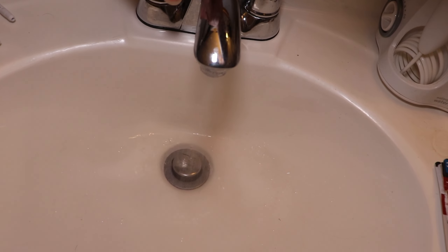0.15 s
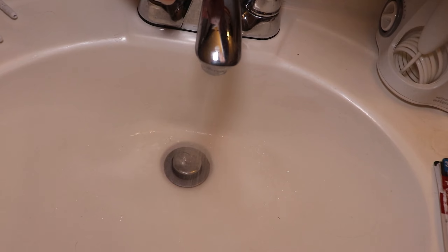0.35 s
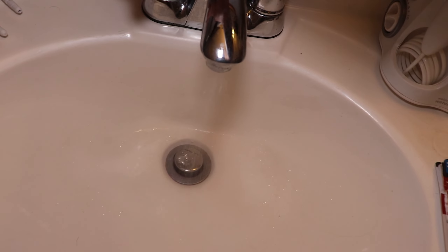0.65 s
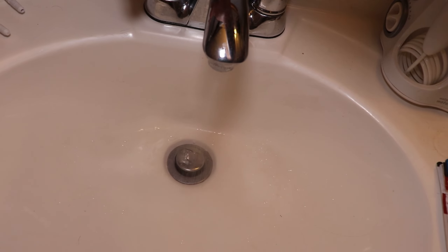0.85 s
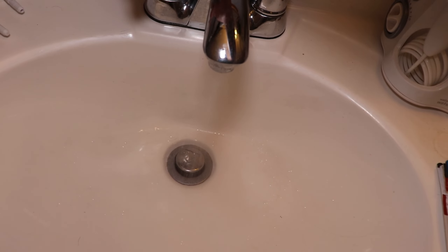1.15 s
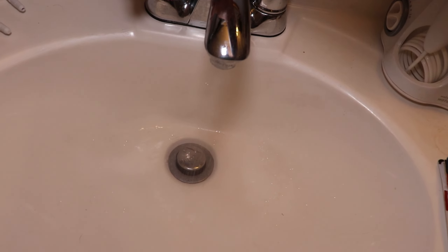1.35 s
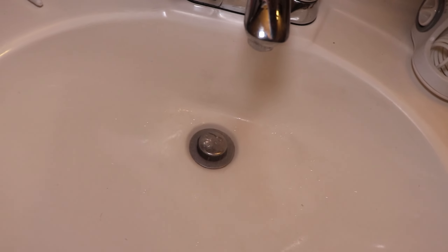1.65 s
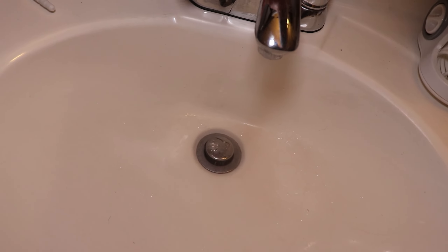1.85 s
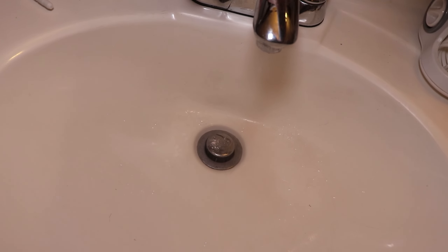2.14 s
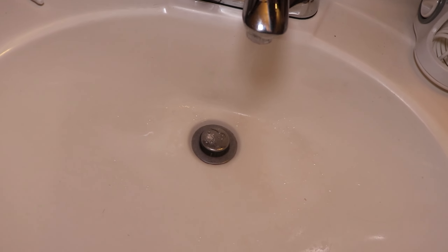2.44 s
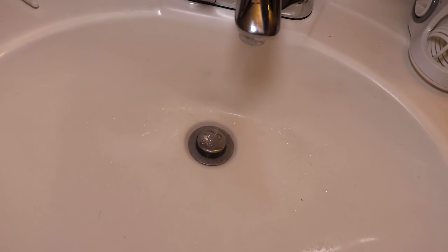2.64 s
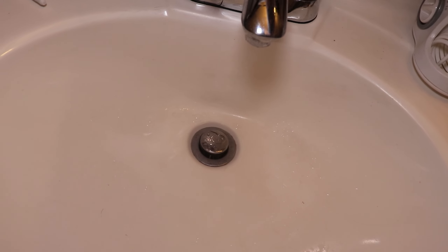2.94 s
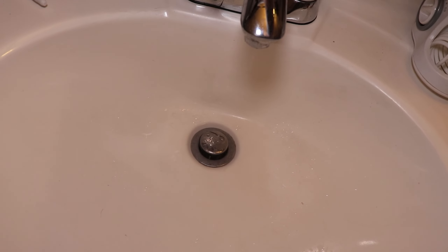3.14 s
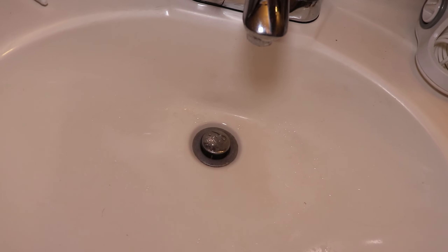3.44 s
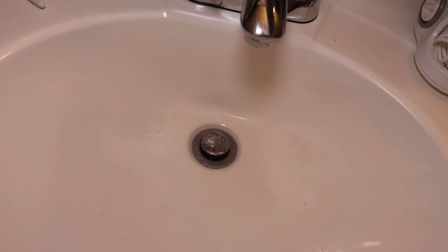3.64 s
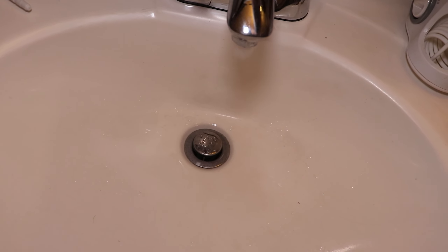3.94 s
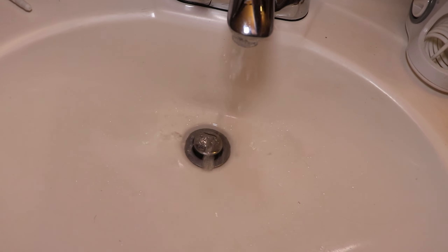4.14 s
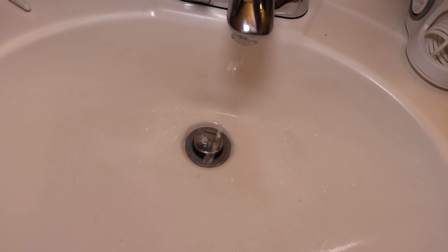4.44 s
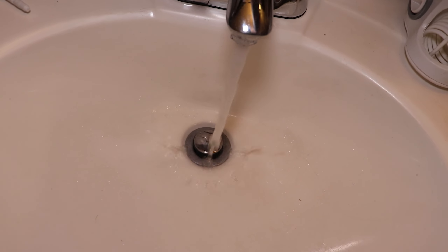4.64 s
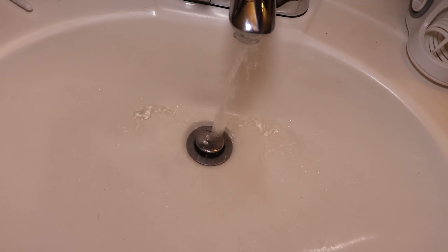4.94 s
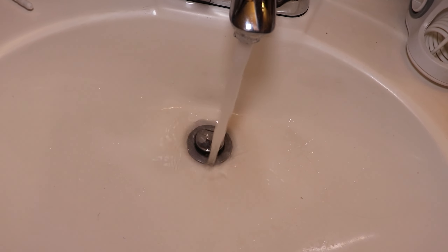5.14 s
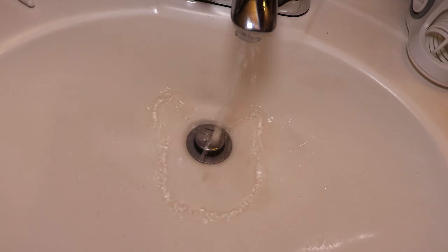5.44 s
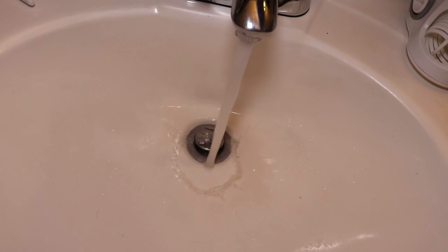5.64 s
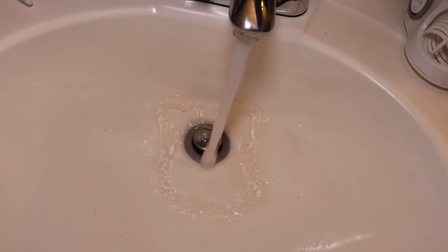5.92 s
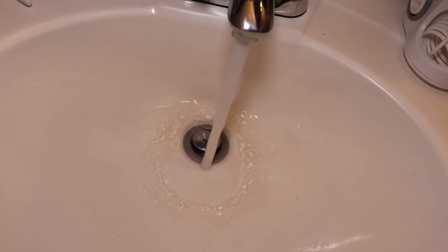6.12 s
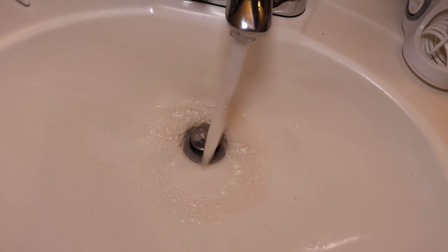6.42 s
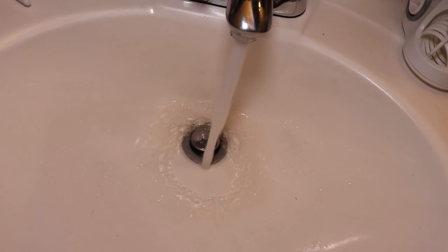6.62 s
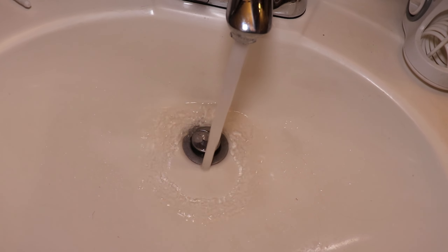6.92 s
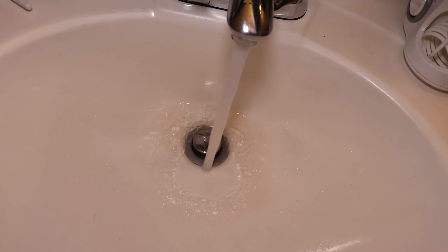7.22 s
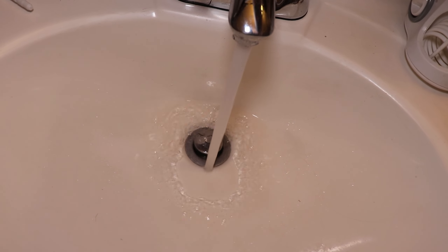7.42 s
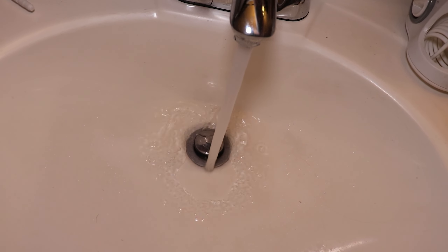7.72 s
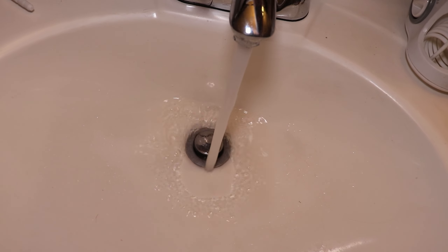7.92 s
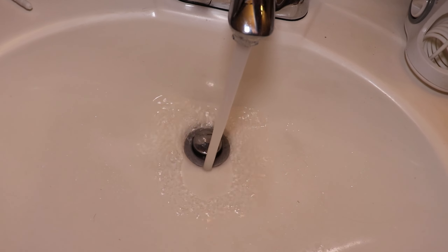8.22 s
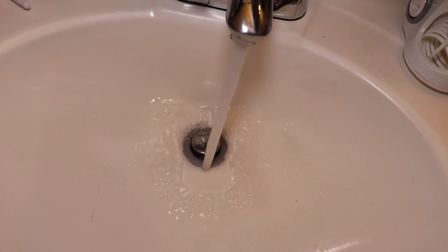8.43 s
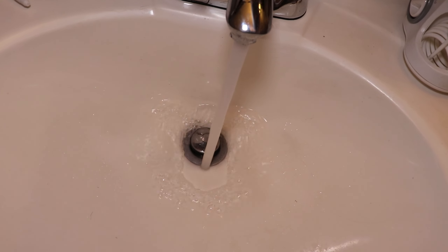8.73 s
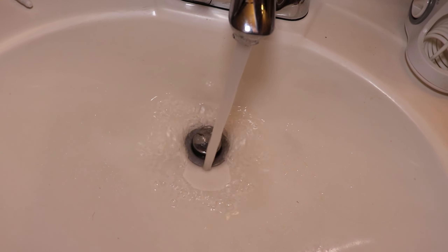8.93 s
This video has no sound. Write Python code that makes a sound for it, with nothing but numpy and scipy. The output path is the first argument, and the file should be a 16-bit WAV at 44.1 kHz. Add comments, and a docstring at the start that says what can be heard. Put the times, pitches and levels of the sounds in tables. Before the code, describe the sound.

Close up in a small hard-walled bathroom, a tap hisses loudly with escaping air while fine mist drums on the basin. The hiss slowly weakens, then chokes as water arrives in violent spits, hissing blasts and hollow slaps, with low gurgles underneath. The spitting thins out and a soft, fizzy aerated stream runs steadily into the drain.

```python
"""In a bathroom, a tap blows out trapped air: a long loud hiss with a mist of water that drums on the basin.
Slugs of water then cut the hiss into blasts and many spits, low gurgles and rumbles sound,
and the flow settles into a soft aerated stream that runs into the drain.
Air and water are showers of random impacts, filtered by the spout, basin, drain and pipe they excite;
large bubbles are decaying sines, and an echo tail stands for the hard walls."""
import sys
import numpy as np
from scipy import signal
from scipy.fft import rfft, next_fast_len
from scipy.io import wavfile
from scipy.ndimage import uniform_filter1d

SR = 44100
rng = np.random.default_rng(int(sys.argv[2]) if len(sys.argv) > 2 else 0)


def transcribe(u):
    """Save the signal u as a 16-bit wav file named by the first command-line argument.

    u: samples, shape (n,) or (channels, n), limited to [-1, 1]; the rate is SR.
    q: integer samples, one column per channel.
    """
    v = np.clip(np.atleast_2d(u).T, -1, 1)
    q = np.round(v * 32767).astype(np.int16)
    wavfile.write(sys.argv[1], SR, q)


N = 399987
TIME = np.arange(N) / SR
TAPS = 8192  # length of the filter design grid
HZ = np.fft.rfftfreq(TAPS, 1 / SR)

# All table levels in dB are relative: gains inside the functions trim them.
# Running stream. Each row: time in seconds, fizz in dB, splashing in dB,
# churn of its remaining air on the basin in dB.
STREAM_LEVELS = [(4.7, -44, -43, -43), (4.8, -44, -43, -44.5), (4.87, -39, -46, -45.5),
                 (5.2, -44, -48, -46.5), (5.28, -38, -38.5, -45), (5.42, -41, -44.5, -44),
                 (5.8, -39, -45, -47), (6.2, -38.5, -46, -39), (6.6, -37.5, -47, -40.5),
                 (6.95, -37.5, -46.5, -40.5), (7.4, -38.5, -45, -44.5), (7.8, -39.5, -49, -48),
                 (8.1, -39.5, -46.5, -48), (8.38, -40, -48, -51), (8.6, -38, -48, -51.5),
                 (9.07, -37, -48.5, -55)]
# Ringing of the basin and its bowl of air. Each row: frequency in Hz, width in Hz, level in dB.
BASIN_MODES = [(349, 39, -6.5), (379.5, 22.5, 1.5), (440, 41, -8), (517, 27, -7.5), (683, 64, -12.5),
               (831, 58, -6.5), (892.4, 19, -1.5), (996, 30, 2.5), (1130, 19, -9), (1100, 41, -0.5),
               (1204, 27, -1.5), (1282, 66, -6), (1422, 45, -4.5), (1506, 110, -11.5), (1793, 21, -8),
               (1940, 50, -27.5), (2015, 71, -9.5), (2120, 43, -26.5), (2183, 54, -14), (2495, 81, -16)]
# Broad colour of wet air. Each row: frequency in Hz, spectral density in dB per Hz.
WET_HISS_COLOUR = [(1000, -57), (1700, -13.5), (1990, 2), (2430, -6.5), (2980, 2), (3810, 3), (4470, -2.5),
                   (5050, 5), (6440, 1), (7990, -6.5), (9370, -3.5), (10700, -8), (12500, -6), (14200, -8),
                   (16000, -18)]
# Broad colour of splashing. Each row: frequency in Hz, spectral density in dB per Hz.
SPLASH_COLOUR = [(400, -9), (700, -10), (1400, 4.5), (1680, 7), (2000, 6.5), (2600, 2.5), (3400, 3.5),
                 (5000, -43), (9000, -26)]


def amp(db):
    """Decibels to amplitude gain."""
    return 10 ** (np.asarray(db) / 20)


def unit(x):
    """Normalizes the effective value (rms) to 1."""
    return x / np.sqrt(np.mean(x ** 2) + 1e-20)


def read(points, hz=HZ):
    """Interpolates a spectrum table linearly on a log-frequency axis."""
    f, value = np.transpose(points)
    return np.interp(np.log(hz + 1), np.log(f), value)


def curves(rows):
    """Interpolates the columns of a table linearly over time."""
    s, *columns = np.transpose(rows)
    return [np.interp(TIME, s, c) for c in columns]


def gate(start, end, fade):
    """Linear envelope: 1 between start and end, falling to 0 over fade seconds outside."""
    return np.clip(1 + np.minimum(TIME - start, end - TIME) / fade, 0, 1)


def swell(start, length, rise, fall):
    """Envelope: sine-squared rise, hold until start + length, exponential decay."""
    level = np.zeros(N)
    part = slice(int(start * SR), int((start + length + .5) * SR))
    age = TIME[part] - start
    attack = np.sin(np.pi / 2 * np.clip(age / rise, 0, 1)) ** 2
    level[part] = attack * np.exp(-np.maximum(age - length, 0) / fall)
    return level


def together(levels):
    """Incoherent addition: the powers of unrelated noises sum."""
    return np.sqrt(sum(np.square(level) for level in levels))


def resonances(modes):
    """Modal response: the powers of bell-shaped resonance peaks sum."""
    power = 0
    for hz, width, db in modes:
        power = power + amp(db) ** 2 / (1 + ((HZ - hz) / (0.67 * width)) ** 2) ** 1.54
    return np.sqrt(power)


def colour(x, gain):
    """Minimum-phase filtering: the Hilbert relation gives the causal phase; the peak gain becomes 1."""
    log_gain = np.log(np.maximum(gain / gain.max(), 1e-5))
    circle = np.concatenate([log_gain, log_gain[-2:0:-1]])
    spectrum = np.exp(np.conj(signal.hilbert(circle)))
    taps = np.fft.ifft(spectrum).real[:TAPS // 2]
    return signal.oaconvolve(x, taps)[:N]


def in_band(x, band):
    """Band-power normalization: scales x so that the given band in Hz has rms 1."""
    power = abs(rfft(x, next_fast_len(N))) ** 2
    hz = np.linspace(0, SR / 2, len(power))
    inside = (hz > band[0]) & (hz < band[1])
    return unit(x) / np.sqrt(power[inside].sum() / power.sum())


def split(x, hz):
    """Complementary crossover: the parts of x below and above hz sum to x."""
    low = signal.oaconvolve(x, signal.firwin(255, min(hz, SR / 2 - 1), fs=SR), "same")
    return low, x - low


def flutter(rate_hz, depth_db):
    """Amplitude modulation by a random gain that wavers up to the given rate."""
    knots = rng.standard_normal(4096)
    return amp(depth_db * np.interp(TIME * rate_hz, np.arange(len(knots)), knots))


def drops(per_s, spread_db, mist):
    """Shot noise: impacts of drops of random size, over the smooth noise of countless tiny ones."""
    size = amp(spread_db * np.minimum(rng.exponential(1, N), 4)) * rng.choice([-1, 1], N)
    impacts = unit(size * (rng.random(N) < per_s / SR))
    return unit(impacts + mist * rng.standard_normal(N))


def jet(levels, spectrum, spout, ring_db, rough_db):
    """Turbulent jet noise: air and mist tear through the aerator mesh and excite the spout's resonances."""
    hiss_level, top_level, spray_level = levels
    ring = np.sqrt(1 + (amp(ring_db) * resonances(spout)) ** 2)
    ring /= np.sqrt(uniform_filter1d(ring ** 2, size=300))  # keeps the peaks, flattens the broad shape
    noise = colour(drops(4000, 2.8, 2.16) * flutter(260, rough_db), amp(read(spectrum)) * ring)
    spray, rest = split(noise, 4050)
    hiss, top = split(rest, 9800)
    hiss = hiss_level * in_band(hiss, (4000, 9000))
    top = top_level * in_band(top, (11000, 15500))
    spray = amp(-1) * spray_level * in_band(spray, (2000, 4000))
    return hiss + top + spray


def purge_flow():
    """Flow choking: levels of the purge's hiss and of its mist decay exponentially once water arrives."""
    # Each row: time in seconds, hiss in dB, top fizz and coarse spray in dB relative to the hiss.
    purge_levels = [(0, -15.5, -3.5, -9), (.6, -15.8, -3, -8.5), (1.45, -16, -3.5, -10),
                    (1.8, -16, -1.5, -11), (2.3, -17, -0.5, -11), (2.55, -18, 0, -10), (2.75, -18, 0.5, -8),
                    (3.05, -20, 1, -9.5), (3.45, -21.5, 2, -9.5), (3.87, -23, 2, -12.5)]
    # Each row: time in seconds, drumming on the basin in dB, deep basin modes in dB relative to the drumming.
    mist_levels = [(.05, -21, -4.5), (.3, -24.5, -8), (.5, -22.5, -5.5), (.62, -27, -8.5), (1, -25, -5.5),
                   (1.5, -26, -8.5), (1.75, -29, -5.5), (2.5, -30, -8), (2.67, -29, -4.5),
                   (2.87, -31, -6.5), (3, -34, -3.5), (3.6, -34, -7), (3.86, -37, -4)]
    hiss_db, top_db, spray_db = curves(purge_levels)
    drum_db, body_db = curves(mist_levels)
    air_end_s, air_choke_s = 3.874, .045  # water reaches the spout and chokes the air
    mist_end_s, mist_choke_s = 3.865, 0.025  # the mist stops first
    hiss = amp(hiss_db) * np.exp(-np.clip(TIME - air_end_s, 0, 1) / air_choke_s)
    drum = amp(drum_db) * np.exp(-np.clip(TIME - mist_end_s, 0, 1) / mist_choke_s)
    return (hiss, hiss * amp(top_db), hiss * amp(spray_db)), (drum, drum * amp(body_db))


def slug_flow():
    """Impulsive flow: each slug's drumming swells and sags slightly; powers of overlapping slugs add."""
    # Slugs of water shot from the spout. Each row: start in seconds, length in seconds,
    # drumming on the basin in dB, spray at the spout in dB.
    slug_rows = [(4.003, 0.15, -32, -36.5), (4.112, 0.29, -28.5, -26.5), (4.353, 0.12, -33.5, -31),
                 (4.583, 0.092, -41, -44), (4.889, 0.074, -25.5, -25), (4.965, 0.11, -29.5, -27),
                 (5.123, 0.12, -35.5, -53), (5.438, 0.1, -25.5, -27), (5.58, 0.069, -38, -49),
                 (5.9, 0.12, -30.5, -48), (6.216, 0.077, -33, -55), (6.373, 0.094, -29, -38.5),
                 (6.508, 0.049, -32, -42), (6.696, 0.11, -37, -52), (7.006, 0.049, -37.5, -59),
                 (7.85, 0.18, -49, -52)]
    sag_db_per_s = 5
    drum, spray = np.zeros((2, N))
    for s, length, drum_db, spray_db in slug_rows:
        shape = swell(s, length, rise=0.04, fall=0.038)
        sag_db = sag_db_per_s * np.clip(TIME - s, 0, length)
        drum += (shape * amp(drum_db - sag_db)) ** 2
        spray += (shape * amp(spray_db)) ** 2
    return np.sqrt(drum), np.sqrt(spray)


def blast_flow(slug_spray):
    """Two-phase flow: each blast's power is shared between dry and wet air; slug spray joins the wet."""
    # Later blasts of air, down to last wisps in the stream. Each row: start in seconds, length in seconds,
    # rise in seconds, hiss in dB, top fizz in dB relative to the hiss, share of dry air from 0 to 1.
    blast_rows = [(3.949, 0.048, 0.017, -35, -2, 0.5), (4.033, 0.0081, 0.0066, -18.5, -5, .9),
                  (4.162, 0.17, 0.029, -18.5, -4.5, 0.4), (4.362, 0.088, 0.029, -22, -8, 0.14),
                  (4.447, 0.039, 0.018, -22, -5.5, 0.2), (4.948, 0.037, .028, -18, -6, 0.4),
                  (5.007, 0.075, 0.022, -18.5, -7.5, .03), (5.472, 0.1, 0.018, -18, -5.5, 0.2),
                  (8.08, 0.091, .07, -39, -14, .05), (8.457, 0.17, 0.092, -39, -10, .05),
                  (8.7, 0.34, .2, -41.5, -8, 0.2)]
    dry = np.zeros((3, N))
    # hiss, top fizz and spray of the slugs, in dB relative to their spray
    wet = np.outer(amp([-1.5, -10, 0]), slug_spray) ** 2
    for s, length, rise, hiss_db, top_db, share in blast_rows:
        band_gains = amp(hiss_db + np.array([0, top_db, -16]))  # hiss, top fizz, spray
        power = np.outer(band_gains, swell(s, length, rise, fall=0.016)) ** 2
        share = np.clip(share, 0, 1)
        dry += share * power
        wet += (1 - share) * power
    return np.sqrt(dry), np.sqrt(wet)


def air(purge, dry_blasts, wet_blasts):
    """Equal-power crossfades recolour the jet as the pipe empties; later blasts are partly wet and ragged."""
    # Spout resonances early, midway and late in the purge, and in the wet blasts.
    # Each row: frequency in Hz, width in Hz, level in dB.
    spout_early = [(3927, 31, 2), (4200, 26, -3), (4850, 36, 1.5), (5900, 48, -9), (6600, 54, -16),
                   (7300, 42, -2), (7100, 190, -1.5), (7620, 54, 2.5), (8190, 25, -15), (8370, 110, -1.5),
                   (9030, 85, -2), (9870, 61, -22)]
    spout_middle = [(3700, 140, 0), (5820, 180, 1.5), (6670, 140, 2), (7260, 150, -6), (7710, 63, -9),
                    (9150, 27, 5.5), (9530, 62, -5), (11900, 62, 0), (12200, 66, 4), (13400, 53, -4),
                    (13900, 110, -5), (15000, 55, -5)]
    spout_late = [(2040, 140, -15), (3920, 100, -2), (5100, 41, -12), (5850, 54, -8), (6380, 120, -1),
                  (7640, 38, -1), (7500, 61, -5), (8420, 50, 2), (8700, 43, -5), (9400, 71, -3),
                  (10650, 120, 1), (10900, 71, -10), (12240, 140, 5), (12900, 71, 6), (13600, 87, -7),
                  (14800, 47, -3)]
    spout_wet = [(3840, 130, 4), (4350, 25, 10.5), (4960, 98, 3.5), (5140, 140, -3), (5660, 43, 3),
                 (5970, 32, 2), (6554, 33, 8.5), (9200, 39, -8), (9420, 100, 5), (12700, 330, 7)]
    # Broad colours of the purge. Each row: frequency in Hz, spectral density in dB per Hz.
    hiss_early = [(1000, -52), (1700, -15), (1980, -7), (2410, -15), (3010, -3.5), (3190, -8), (3810, -3),
                  (4550, -7.5), (4950, -4.5), (6500, -4.5), (7410, -1.5), (10300, -8.5), (12400, -5.5),
                  (13800, -3.5), (16000, -14.5)]
    hiss_middle = [(1000, -45.5), (1700, -18), (1980, -8), (2670, -17), (2900, -4.5), (3160, -10),
                   (3810, -6.5), (5290, -3), (5760, 1), (6200, -2.5), (7480, 2), (10000, -4), (12100, 1),
                   (14400, 2), (16000, -10)]
    hiss_late = [(1000, -50), (1700, -12.5), (2090, -9), (2410, -12.5), (2790, -11), (3340, -8),
                 (4600, -7.5), (4770, -3), (6380, -2), (6940, -1.5), (9640, -2), (10200, -3), (13500, 2.5),
                 (15100, 1), (16000, -26)]
    eased = np.clip((TIME - 1.15) / 0.54, 0, 1)
    spent = np.clip((TIME - 2.35) / 0.29, 0, 1)
    purge = amp(-0.85) * np.array(purge)
    middle_levels = purge * np.sqrt(eased * (1 - spent)) + dry_blasts
    early = jet(purge * np.sqrt(1 - eased), hiss_early, spout_early, ring_db=7.5, rough_db=0.5)
    middle = jet(middle_levels, hiss_middle, spout_middle, ring_db=0.5, rough_db=1.14)
    late = jet(purge * np.sqrt(spent), hiss_late, spout_late, ring_db=3.0, rough_db=1.1)
    wet = jet(wet_blasts, WET_HISS_COLOUR, spout_wet, ring_db=2.5, rough_db=2.1)
    return early + middle + late + wet


def basin(drum_level, body_level):
    """Modal excitation: drops drum on the basin and shake its deep modes, each at its own level."""
    ringing = colour(drops(1500, 3.05, 0.96) * flutter(60, 0.83), resonances(BASIN_MODES))
    body, drum = split(ringing, 607)
    drum = drum_level * in_band(drum, (750, 1350))
    body = body_level * in_band(body, (320, 560))
    return amp(-0.5) * (drum + body)


def splatter(mist, slugs, churn):
    """Broadband impact noise: water that has struck the basin spreads and splatters over it."""
    # Each row: frequency in Hz, spectral density in dB per Hz.
    splatter_colour = [(80, -60), (180, -30), (270, 0.5), (330, -2.5), (490, 3.5), (590, -3.5), (720, -2),
                       (1000, -0.5), (1450, 0.5), (2100, -0.5), (2700, -3.5), (3600, -13), (6000, -23)]
    # gains relative to the drumming of each flow
    level = together([mist * amp(-10), slugs * amp(-6.5), churn * amp(-1.5)])
    noise = drops(900, 2.7, 0.95) * flutter(70, 1.7)
    return level * unit(colour(noise, amp(read(splatter_colour))))


def spits():
    """Pressure release: each air pocket bursts with a quick hiss and throws a slug of water at the basin."""
    # Air pockets bursting at the spout. Each row: time in seconds, hiss in dB,
    # slap on the basin in dB, decay time in seconds.
    spit_rows = [(4.034, -34, -20, 0.0064), (4.114, -20.5, -26, 0.019), (4.544, -22, -28, 0.012),
                 (4.593, -26, -20, 0.024), (4.645, -31, -26, 0.016), (4.768, -33, -30, 0.0081),
                 (4.841, -31.5, -35, 0.0071), (4.866, -36, -50, 0.011), (4.902, -36, -21, 0.047),
                 (5.217, -39, -29, .012), (5.449, -32, -16, 0.056), (5.732, -33, -31, 0.011),
                 (5.912, -26, -17.5, 0.03), (5.972, -26, -22, 0.016), (6.036, -45, -33, .006),
                 (6.233, -39, -21.5, 0.016), (6.383, -31, -16, 0.023), (6.411, -25, -21.5, 0.032),
                 (6.517, -29.5, -16.5, 0.006), (6.702, -51, -26, 0.035), (6.886, -47, -25, 0.018),
                 (7.036, -58, -37, 0.022), (8.041, -52, -30, .018)]
    hiss_level, slap_level = np.zeros((2, N))
    for s, hiss_db, slap_db, decay in spit_rows:
        part = slice(int(s * SR), int((s + .3) * SR))
        age = np.maximum(TIME[part] - s, 0)
        burst = np.minimum(age / 0.0011, 1) * np.exp(-np.maximum(age - .007, 0) / decay)
        hiss_level[part] += amp(hiss_db) * burst
        slap_level[part] += amp(slap_db) * burst
    hiss = unit(colour(drops(3900, 2.2, 0.94), amp(read(WET_HISS_COLOUR))))
    slap_gain = resonances(BASIN_MODES) + 0.16 * amp(read(SPLASH_COLOUR))
    slap = unit(colour(drops(2500, 1, 1), slap_gain))
    return amp(-3.5) * hiss_level * hiss + amp(-6.5) * slap_level * slap


def churn_flow():
    """Fluctuating flow: a randomly wavering level at which air left in the stream churns it on the basin."""
    churn_db = curves(STREAM_LEVELS)[-1]
    build_up = gate(4.1, TIME[-1], .4)  # complete at 4.1 s
    return amp(churn_db) * flutter(7.6, depth_db=-0.3) * build_up


def bubbles(per_s, low_hz, high_hz, cycles, count=24):
    """Bubble resonance: small bubbles ring briefly and rise in pitch as they reach the surface."""
    t, out = np.arange(2048) / SR, np.zeros(N)
    for hz in np.geomspace(low_hz, high_hz, count):
        life = cycles / hz
        ring = np.exp(-t / life) * np.sin(2 * np.pi * hz * t * (1 + 0.02 * t / life))
        born = rng.random(N) < per_s / count / SR
        births = born * amp(4 * np.minimum(rng.exponential(1, N), 4))
        out += signal.oaconvolve(births, ring)[:N]
    return unit(out)


def stream():
    """Shot noise and bubble resonance: the aerated stream fizzes and splashes round the stopper."""
    # Each row: frequency in Hz, width in Hz, level in dB.
    stream_modes = [(1990, 41, 12.5), (3770, 61, 2), (4120, 32, 2), (4810, 63, 6.5), (5250, 110, 4),
                    (5720, 54, -8), (6420, 160, 1), (7320, 230, -20.5), (9250, 240, -3)]
    # Each row: frequency in Hz, spectral density in dB per Hz.
    fizz_colour = [(1500, -17.5), (2800, -7.5), (4000, -3.5), (5000, -2), (6500, -3.5), (9000, -3),
                   (10800, -5.5), (12800, -2), (14000, -4.5), (15800, -10)]
    fizz_db, splash_db, _ = curves(STREAM_LEVELS)
    ring = np.sqrt(1 + (amp(-2) * resonances(stream_modes)) ** 2)
    fizz = colour(drops(3500, 3.1, 1.3) * flutter(90, 1.0), amp(read(fizz_colour)) * ring)
    fizz = in_band(fizz, (4000, 15000))
    splash = unit(colour(drops(1200, 2.6, 0.77) * flutter(50, 0.98), amp(read(SPLASH_COLOUR))))
    trapped = amp(-8) * bubbles(400, 598, 4330, cycles=11)
    splash = in_band(splash + trapped, (1800, 3500))
    return (amp(fizz_db + 1.8) * fizz + amp(splash_db + 0.5) * splash) * gate(4.74, TIME[-1], 0.59)


def plops():
    """Bubble resonance: large bubbles ring at their own pitch, rising a little as they die."""
    # Each row: time in seconds, starting pitch in Hz, level in dB, decay time in seconds.
    plop_rows = [(3.3, 150, -35, 0.014), (3.38, 95, -40, 0.017), (4.064, 2232, -16.5, 0.0054),
                 (5.731, 2510, -24.5, 0.0074), (5.967, 1940, -26, .007), (6.034, 990, -21.5, .015),
                 (6.517, 970, -20, 0.021), (6.56, 1080, -25, .008), (6.914, 212, -33, 0.032),
                 (7.04, 1011, -25, 0.025)]
    out, t = np.zeros(N), np.arange(SR // 5) / SR
    for s, hz, db, decay in plop_rows:
        tone = np.sin(2 * np.pi * hz * t * (1 + 0.0043 * t / decay))
        ring = tone * np.exp(-t / decay) * (1 - np.exp(-t / 0.0012))
        out[int(s * SR):][:len(t)] += amp(db) * ring
    return out


def drain():
    """Cavity resonance: water running past the stopper keeps the drain's hollow ringing."""
    # Each row: time in seconds, level in dB.
    drain_levels = [(4.2, -60), (4.75, -41.5), (5.5, -44), (6.5, -41), (7.3, -43.5), (8.2, -45.5),
                    (8.6, -46.5), (9.07, -48)]
    level_db, = curves(drain_levels)
    # frequency in Hz, width in Hz, level in dB
    hollow = resonances([(1423, 39, 3), (1490, 58, -2), (683, 82, -14.0), (440, 35, -15)])
    ring = unit(colour(drops(900, 2.2, 0.98), hollow))
    return amp(level_db) * ring * gate(4.32, TIME[-1], .2)


def low_end(mist, slugs, churn):
    """Filtered shot noise: mist and slugs rattle through the pipe, with separate gurgles and low rumbles."""
    # Gurgles and low rumbles. Each row: start in seconds, length in seconds, gurgle in dB, rumble in dB.
    gurgle_rows = [(2.95, 0.54, -58, -56.5), (3.854, 0.16, -45, -57), (4.48, 0.15, -45, -55),
                   (4.88, .17, -41, -55), (5.05, 0.07, -43, -45), (5.14, .09, -45, -58),
                   (5.433, 0.13, -40, -55), (5.618, 0.16, -49, -53), (5.885, .13, -40.5, -57),
                   (6.206, .36, -44.5, -60), (6.72, .4, -44, -66), (7.15, 0.55, -52.5, -70),
                   (7.78, .25, -49, -73), (8.317, 0.06, -52, -61)]
    # Ringing of the gurgles. Each row: frequency in Hz, width in Hz, level in dB.
    gurgle_modes = [(142, 14, -4), (183, 28, 1.5), (231, 32, -3.5)]
    # Broad colours of rattle and rumble. Each row: frequency in Hz, spectral density in dB per Hz.
    rattle_colour = [(60, -30), (120, -24.5), (155, -4), (190, -1), (215, -2), (235, -2), (270, -2.5),
                     (300, -16), (420, -33.5)]
    rumble_colour = [(20, -11), (40, -11), (58, -8), (78, 5), (108, 7.5), (150, -15), (260, -38)]
    # gains relative to the drumming of each flow
    rattle_levels = [mist * amp(-18), slugs * amp(-18.5)]
    gurgle_levels = [churn * amp(-9.5)]
    rumble_levels = [mist * amp(-33.5), slugs * amp(-28.5), churn * amp(-34)]
    for s, length, gurgle_db, rumble_db in gurgle_rows:
        shape = swell(s, length, rise=0.036, fall=.04)
        gurgle_levels.append(amp(gurgle_db) * shape)
        rumble_levels.append(amp(rumble_db) * shape)
    rattle = in_band(colour(drops(150, 1.25, 1.0), amp(read(rattle_colour))), (130, 280))
    gurgle = unit(colour(drops(120, 2.3, 0.62), resonances(gurgle_modes)))
    rumble = in_band(colour(drops(80, 4, 0.51), amp(read(rumble_colour))), (40, 120))
    pitched = together(rattle_levels) * rattle + together(gurgle_levels) * gurgle
    return pitched + amp(0.5) * together(rumble_levels) * rumble


def bowl(x):
    """Interference: echoes inside the bowl cut the same notches, and slight peaks, into every sound."""
    # Each row: frequency in Hz, width in Hz, gain in dB (negative where echoes cancel the direct sound).
    echo_notches = [(258, 9.9, -4.5), (310, 7.8, -2.5), (1700, 47, -4), (2420, 40, -3), (2800, 38, -3.5),
                    (3560, 75, 1.5), (4520, 63, 0.5), (10150, 350, -0.5)]
    gain_db = sum(db / (1 + (2 * (HZ - hz) / width) ** 2) for hz, width, db in echo_notches)
    return amp(0.34) * colour(x, amp(gain_db))


def bathroom(x):
    """Reverberation: dense echoes from the close hard walls, the treble dying first."""
    # Each row: frequency in Hz, time to decay by 60 dB in seconds.
    decay_times = [(200, 0.4), (2000, 0.26), (8000, 0.12), (16000, 0.047)]
    taps = rng.standard_normal(SR // 2) * (rng.random(SR // 2) < 3000 / SR)
    taps[:int(.003 * SR)] = 0  # delay before the first echo
    hz, t, z = signal.stft(taps, SR, nperseg=256)
    decay = amp(-60 * t / read(decay_times, hz)[:, None])
    tail = signal.istft(z * decay, SR, nperseg=256)[1]
    return signal.oaconvolve(x, tail / np.linalg.norm(tail))[:N]


def scene():
    """Superposition: close sources add in mono, and the hard walls throw back mostly treble."""
    purge, (mist, mist_body) = purge_flow()
    slugs, spray = slug_flow()
    churn = churn_flow()
    drum_level = together([mist, slugs, churn])
    body_level = together([mist_body, slugs * amp(-6), churn * amp(-7.5)])
    tap = air(purge, *blast_flow(spray)) + spits() + stream()
    water = basin(drum_level, body_level) + splatter(mist, slugs, churn) + plops()
    near = bowl(tap + water + drain() + low_end(mist, slugs, churn))
    low, high = split(near, 2030)
    mix = near + bathroom(amp(-13.5) * low + amp(-7) * high)
    return np.array([mix, mix])


def record(dry):
    """Band limiting and soft saturation: a low cut, peaks rounded off, then a treble cut."""
    low_cut_hz, treble_edge_hz, ceiling = 66, 16000, .98
    low_cut = signal.butter(4, low_cut_hz, "high", fs=SR, output="sos")
    thin = signal.sosfilt(low_cut, amp(0.78) * dry)
    rounded = thin / (1 + (thin / ceiling) ** 8) ** (1 / 8)
    treble_cut = signal.firwin(511, treble_edge_hz, window=("kaiser", 9), fs=SR)
    return signal.oaconvolve(rounded, treble_cut[None], "same")


dry = scene()
out = record(dry)
transcribe(out)
```